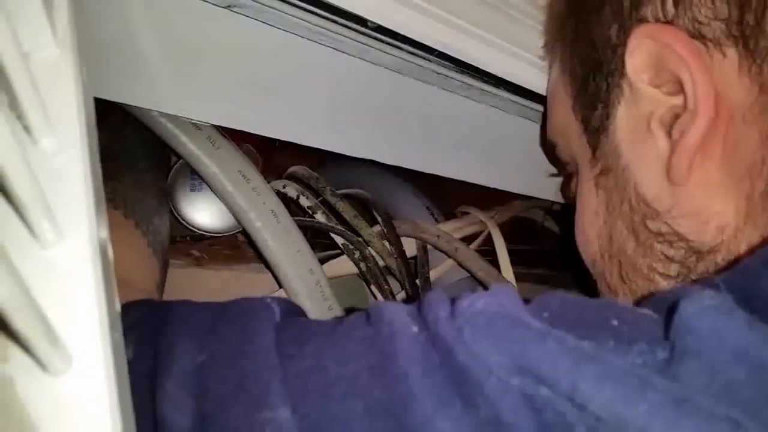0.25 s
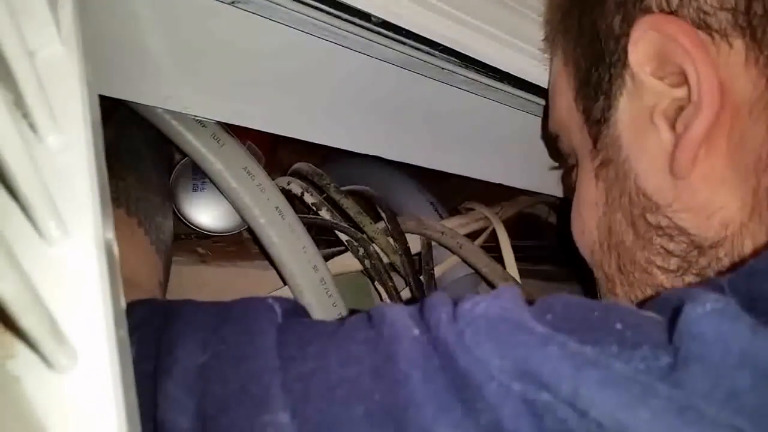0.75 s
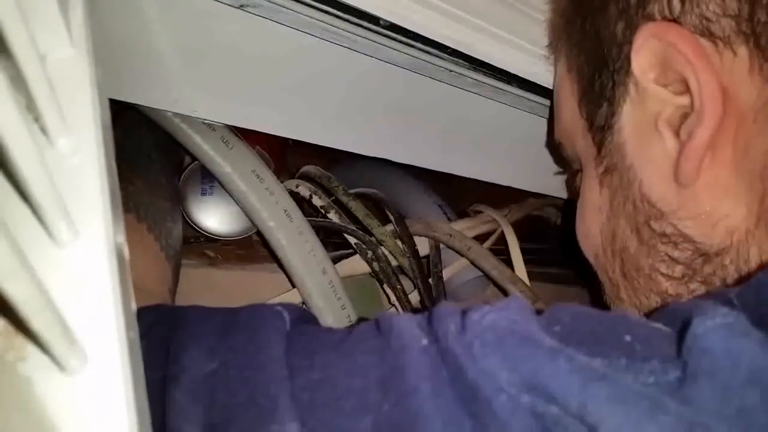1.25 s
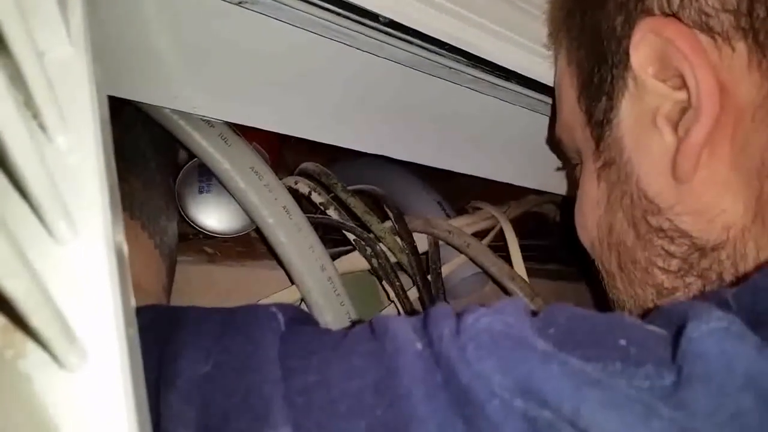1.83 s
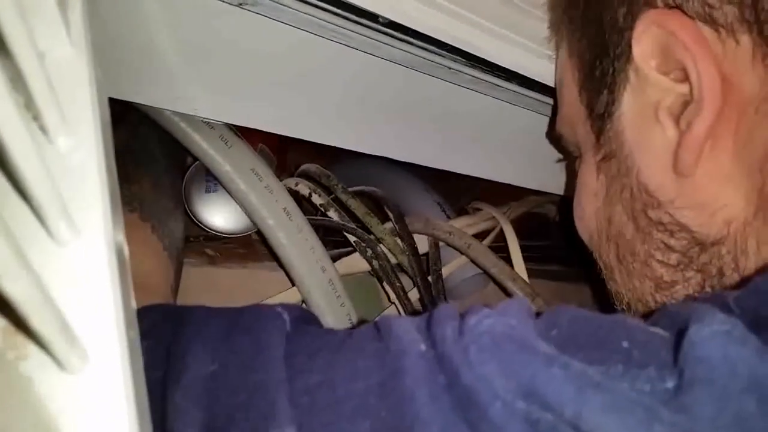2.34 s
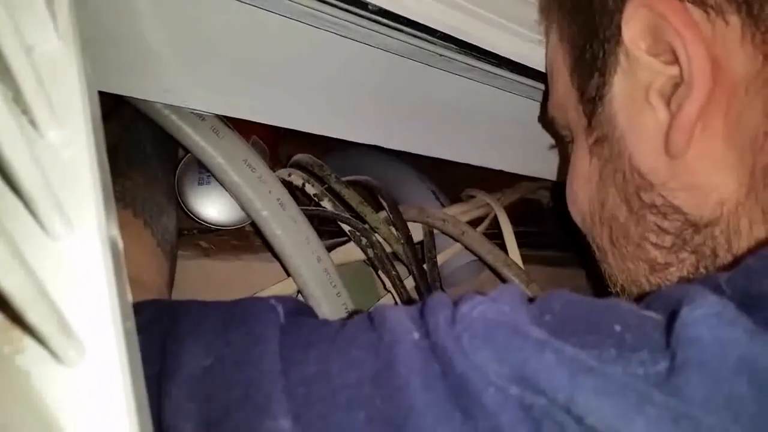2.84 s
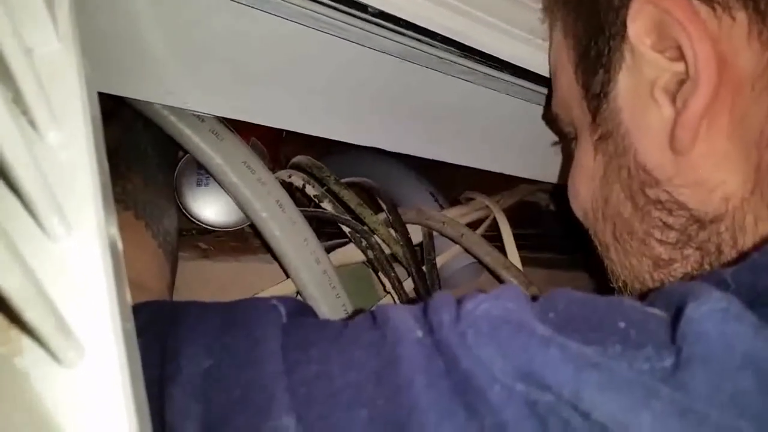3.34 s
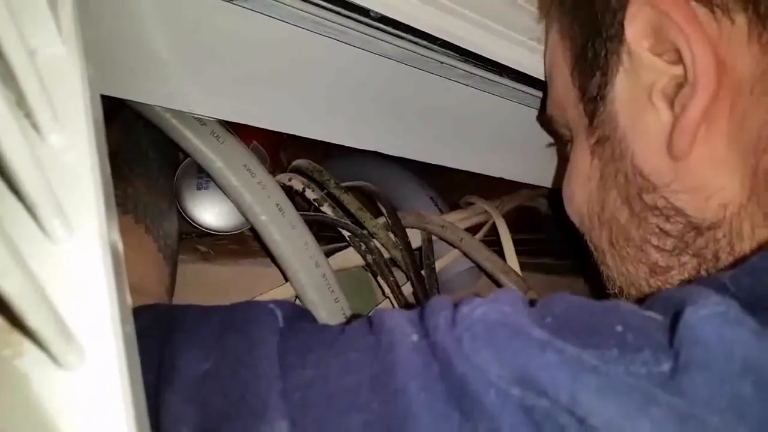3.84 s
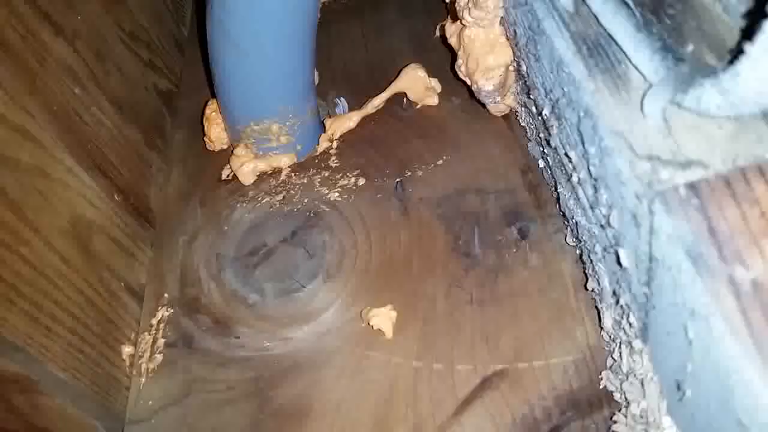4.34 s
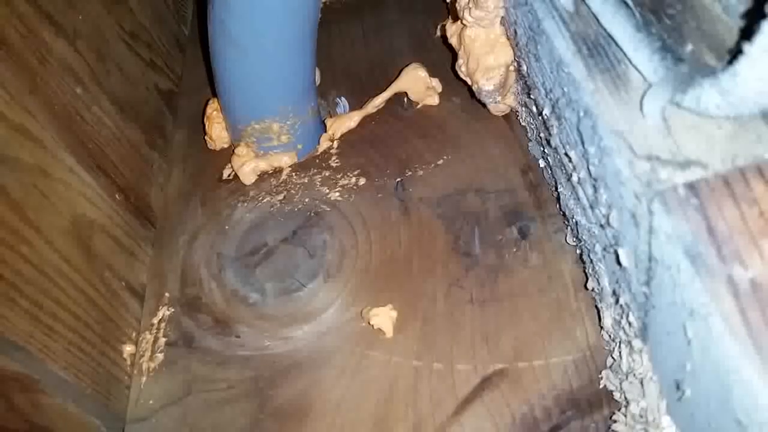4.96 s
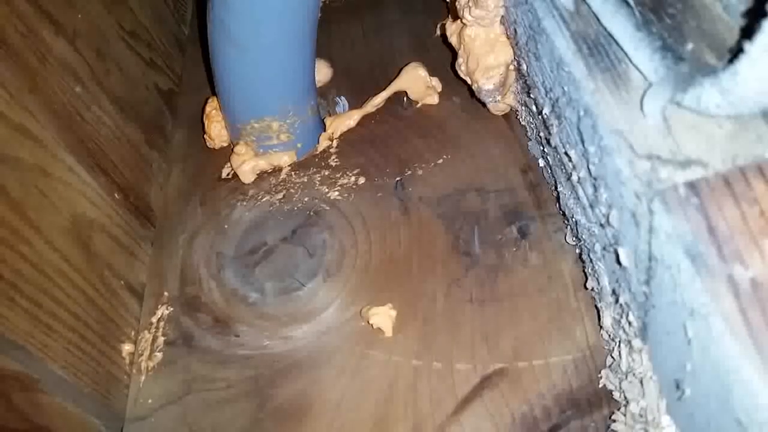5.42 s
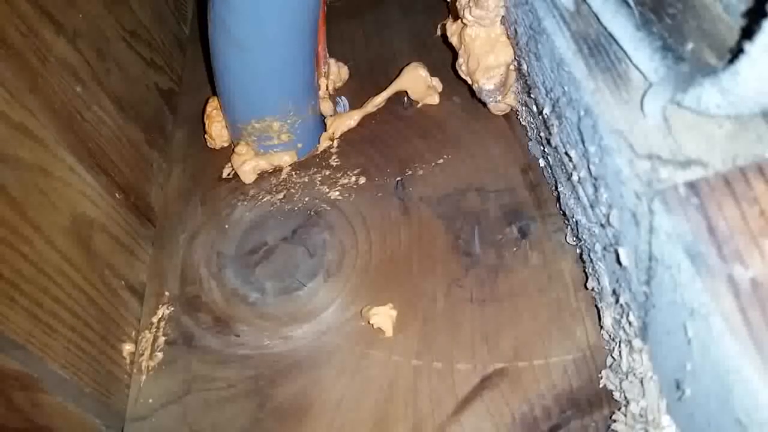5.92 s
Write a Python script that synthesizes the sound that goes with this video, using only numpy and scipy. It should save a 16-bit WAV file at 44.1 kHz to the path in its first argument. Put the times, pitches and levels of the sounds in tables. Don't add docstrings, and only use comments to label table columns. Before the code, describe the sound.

A foam can spurts, spits and blows out amid low wind thumps, then abruptly close, a fading hiss and dull timber knocking.

```python
import sys
import numpy as np
from scipy import signal
from scipy.fft import rfft, irfft, next_fast_len
from scipy.io import wavfile
from scipy.ndimage import uniform_filter1d, map_coordinates

SR = 44100
rng = np.random.default_rng(int(sys.argv[2]) if len(sys.argv) > 2 else 0)


def invert_db(level):
    return 10 ** (np.asarray(level, dtype=float) / 20)


def transcribe(u):
    v = np.clip(np.atleast_2d(u).T, -1, 1)
    q = np.round(v * 32767).astype(np.int16)
    wavfile.write(sys.argv[1], SR, q)


N = 273023
TIME = np.arange(N) / SR
CUT_S = 4.298

# time_s, hiss_db
GAS_FLOW = [(.81, -41), (.817, -44), (.88, -40.5), (1.045, -44.5), (1.11, -33), (1.65, -32.5), (2.05, -31),
            (3.53, -30), (3.6, -29)]
# deepest_s, depth_db, closing_s, clearing_s
FOAM_CHOKES = [(1.025, 68, 0.09, 0.018), (1.201, 13.5, 0.058, 0.094), (1.4, 7.5, 0.044, 0.047),
               (1.6, 3, 0.029, 0.037), (1.78, 2.5, 0.11, 0.22), (2.39, 4, 0.032, 0.027),
               (2.5, -3, 0.11, .14), (2.66, 13, 0.013, 0.012), (2.71, 0.5, .03, 0.029),
               (2.86, 2.5, 0.05, 0.08), (2.96, -3.5, .06, 0.038), (3.08, 3, .14, 0.32)]
# time_s, low_end_db
FOAM_LOAD = [(.8, 3), (1.05, -18), (1.7, -7), (1.95, -2), (2.95, -0.5), (3.25, -12.5), (3.5, -10),
             (3.55, -4.5)]
# freq_hz, level_db_per_hz
JET_HISS = [(1200, -61), (1850, -43), (2200, -4.5), (2600, -20.5), (3300, -16.5), (3930, -15), (4860, -6),
            (6060, -13), (7500, 1), (9450, -6.5), (12700, -5), (14500, -8), (15000, -8.5)]
# freq_hz, level_db_per_hz
JET_BODY = [(520, -67), (700, -9), (950, -9.5), (1100, -13), (1300, -6), (1800, -6), (2300, -5),
            (3000, -2.5), (4000, 1.5), (6000, -4.5), (7500, -2), (10000, -56.5)]
# freq_hz, level_db_per_hz
EDGE_TONE = [(11000, -25.5), (12300, -16), (12850, 2.5), (13300, -21), (14500, -52)]
# freq_hz, width_hz, lift_db
STRAW_MODES = [(1123, 310, 4.5), (1320, 28, 7), (1897, 356, -6), (1957, 110, 6.5), (2260, 300, 1.5),
               (2670, 420, -5.5), (3415, 260, -5.5), (3550, 130, 0.5), (3960, 110, 6), (4470, 300, -4),
               (4970, 29, 5.5), (5703, 190, 11), (6950, 210, -2.5), (8100, 86, 8), (8394, 57, 8),
               (7382, 130, 6.5), (8890, 50, 10), (9900, 70, 5.5), (11900, 190, 7)]
# peak_s, level_db, rise_db_per_s, fall_db_per_s
BLOWOUT_SWELLS = [
    (2.69, -39.5, 599, 84.5),
    (3.6, -22, 113.5, 124.5),
]
# freq_hz, level_db_per_hz
BLOWOUT_ROAR = [(100, -32.5), (220, -4.5), (400, 0), (700, -4), (1000, -19), (1280, -7), (1500, -21.5),
                (2200, -5), (3000, -25)]
# start_s, peak_db, t60_s
SPIT_EVENTS = [
    (.131, -42, 0.039),
    (0.152, -53, 0.12),
    (1.046, -54, 0.033),
    (2.677, -15.5, 0.039),
]
# freq_hz, level_db_per_hz
CLOSE_HISS = [(2350, -13.5), (4000, -24), (5830, -6), (6950, 9.5), (7510, 0), (8770, 10.5), (9850, -0.5),
              (13900, 2.5), (15000, -4)]
# freq_hz, level_db_per_hz
CLOSE_BODY = [(530, -56), (900, -33.5), (1020, -27.5), (1510, -11), (1910, -11.5), (2070, -9), (2780, -15),
              (3620, -16.5), (5000, -15.5), (6500, -20), (11000, -120)]
# freq_hz, width_hz, lift_db
CLOSE_STRAW_MODES = [(2070, 170, 7.5), (2460, 80, 4), (3600, 260, 4), (7200, 330, 4.5), (8400, 81, -4),
                     (10300, 200, 7)]
# peak_s, level_db, rise_db_per_s, fall_db_per_s
DRIBBLE_SWELLS = [
    (4.855, -48, 205, 496),
    (5.0, -53, 150, 451.5),
]
# start_s, thud_db, rap_db_above_thud, click_db_above_thud
TIMBER_KNOCKS = [(4.79, -36, -6, -36), (4.904, -27, -5, 0.5), (4.939, -24.5, -16.5, -20),
                 (5.005, -34, -9, -3), (5.095, -27, -15, -40), (5.14, -28, -15, -45),
                 (5.209, -23.5, -11, -20.5), (5.3, -31, -15, -39), (5.397, -37, -16, -38),
                 (5.407, -23, -11.5, -18.5), (5.492, -26, -7, -18.5), (5.56, -26, -9, -16),
                 (5.577, -25.5, -14, -20), (5.629, -31.5, -17.5, -25), (5.69, -43.5, -9.5, -40),
                 (5.921, -58, -34, -40), (5.961, -55.5, -26, -24), (6.044, -86, -6, -42),
                 (6.156, -32, -29, -42)]
# freq_hz, width_hz, level_db
TIMBER_MODES = [(105, 18, -12), (145, 12, -1), (211.5, 26, -9), (355, 34, -10)]
# freq_hz, width_hz, level_db
FACE_MODES = [(420, 103, 6), (1060, 460, -1.5), (2020, 410, -6)]
# time_s, rumble_db
GRIP_FORCE = [(4.3, -50), (4.8, -45), (4.95, -42.5), (5.4, -43.5), (5.6, -40.5), (5.75, -48.5),
              (6.19, -50.5)]
# freq_hz, level_db_per_hz
GRIP_RUMBLE = [(15, -45), (25, -18), (70, -5), (102, 0.5), (221, -14), (260, -15.5), (339, -23),
               (600, -45.5), (780, -31), (1320, -120)]
# peak_s, level_db, rise_db_per_s, fall_db_per_s
SLEEVE_BRUSH = [
    (4.81, -53.5, 160, 13),
]
# freq_hz, level_db_per_hz
SLEEVE_CLOTH = [(1760, 2.5), (3000, -4.5), (5840, -4), (8870, -4.5), (10700, -10), (11900, 1.5),
                (14000, -7), (15000, -7.5)]
# time_s, buffet_db
DRAUGHT_FORCE = [(0, -35), (.35, -35), (.65, -42), (1.0, -39.5), (1.5, -39.5), (1.7, -44), (2.4, -43.5),
                 (2.9, -39), (3.4, -48), (3.7, -36), (3.94, -41), (4.3, -34.5)]
# freq_hz, level_db_per_hz
DRAUGHT_BUFFET = [(12, -22), (20, -2.5), (97, -6), (109, -3), (145, -17), (182, -24.5), (206, -38.5),
                  (300, -28.5), (390, -58.5), (660, -120)]
# start_s, peak_db, pitch_hz, length_cycles
EDDY_PUFFS = [(0.296, -25.5, 93, 1.6), (0.428, -17, 90, 2.1), (0.869, -20, 100, 1.1),
              (1.851, -29.5, 102, 2.1), (1.917, -24, 105, 1.6), (2.076, -21, 107, 1.83),
              (2.757, -8.5, 99, 1.3), (2.784, -15.5, 109, 2.6), (3.111, -27, 118, 4.9),
              (3.624, -12, 105, 1.04), (3.656, -17, 107, 0.86), (3.767, -4.5, 105, 1.16),
              (3.816, -15, 105, 1.2), (3.923, -10, 103, 1.48), (4.103, -20.5, 100, 1.5),
              (4.239, -23, 109, 1.5), (4.303, -8.5, 120, 1.2)]
# freq_hz, t60_s
ROOM_DECAY = [(300, 1.71), (1500, 1.66), (4000, 0.92), (6000, 0.95), (8000, 0.92), (14000, 0.48)]
# freq_hz, t60_s
CAVITY_DECAY = [(100, 0.82), (1000, 0.24), (10000, 0.22)]
# freq_hz, level_db_per_hz
ROOM_TONE = [(88, -54.5), (150, -4.5), (289, -16), (350, -5), (386, -15.5), (545, -14.5), (972, -25),
             (1430, -38.5), (1730, -34.5), (7940, -44.5), (10000, -56), (13900, -39.5), (15000, -61)]
# freq_hz, level_db_per_hz
CAVITY_TONE = [(150, -36), (250, -8), (433, 3.5), (631, -13.5), (699, -2.5), (1020, -16.5), (3160, -25),
               (3810, -20), (4370, -26.5), (8670, -47), (15000, -18.5)]
# freq_hz, width_hz, lift_db
PORT_COLOUR = [(5700, 520, -8.5), (8740, 730, 9.5), (10000, 370, -2)]
# freq_hz, threshold_db
LOSS_THRESHOLD = [(150, -43), (280, -7.5), (500, -6), (750, -12.5), (1150, -5.5), (1750, -8.5), (2200, -12),
                  (3100, -3.5), (4400, -0.5), (6700, -8), (9000, -15), (14000, -3.5)]


def unit(x):
    return x / np.sqrt(np.mean(x ** 2) + 1e-20)


def along(points, hz):
    f, v = np.transpose(points)
    return np.interp(np.log(hz + 1), np.log(f + 1), v)


def levels(rows):
    s, db = np.transpose(rows)
    return np.interp(TIME, s, db, left=-150, right=-150)


def wobble(rate):
    return map_coordinates(rng.standard_normal(int(N * rate / SR) + 4), [TIME * rate])


def bursts(rows, quick=1):
    total = 0
    for s, db, rise, fall in rows:
        drop_db = np.where(TIME < s, rise * (s - TIME), quick * fall * (TIME - s))
        total = total + invert_db(db - drop_db)
    return total


def filtered(x, response):
    m = next_fast_len(N + SR // 2)
    return irfft(rfft(x, m) * response(np.fft.rfftfreq(m, 1 / SR)), m)[..., :N]


def noise(spectrum, lifts=(), patchy_db=0, channels=1):
    z = signal.stft(rng.standard_normal((channels, N)), nperseg=512)[2]
    field = uniform_filter1d(rng.standard_normal(z.shape[1:]), 6, 0)
    field = uniform_filter1d(field, 12, 1)
    white = signal.istft(z * invert_db(patchy_db * unit(field)), nperseg=512)[1][:, :N]

    def colour(f):
        lift_db = sum(db / (1 + (2 * (f - c) / w) ** 2) for c, w, db in lifts)
        return invert_db(along(spectrum, f) + lift_db)

    return unit(filtered(white, colour))


def ringing(x, modes):
    def response(f):
        total = 0
        for k, (c, w, db) in enumerate(modes):
            total = total + (-1) ** k * invert_db(db) * 1j * f * w / (c * c - f * f + 1j * f * w)
        return total

    return filtered(x, response)


def jet(hiss_gain, body_gain, hiss, body, straw, flutter_db):
    flutter = invert_db(flutter_db * wobble(30.19) + 1.33 * flutter_db * wobble(140))
    hiss_part = hiss_gain * noise(hiss, straw, patchy_db=1.0)
    body_part = body_gain * noise(body, straw, patchy_db=1.5)
    return flutter * (hiss_part + body_part)


def valve():
    end_s, end_db = GAS_FLOW[-1]
    shut_db = end_db - 798.5 * (TIME - end_s)
    flow_db = np.where(TIME < end_s, levels(GAS_FLOW), shut_db)
    choke_db = 0
    for s, db, closing, clearing in FOAM_CHOKES:
        choke_db = choke_db + db * np.interp(TIME, [s - closing, s, s + clearing], [0, 1, 0])

    def opened(half_db, wide_db):
        return np.interp(TIME, [1.46, 1.94], [half_db, wide_db])

    hiss = invert_db(flow_db - choke_db)
    body = invert_db(flow_db - 0.7 * choke_db + opened(-12, -6.5))
    body += invert_db(-2.5) * blowouts(quick=7.5)
    edge = invert_db(flow_db - 2.2 * choke_db + opened(-4.5, -21.5))
    return hiss, body, edge


def laden(x):
    low = filtered(x, lambda f: 1 / (1 + (f / 1284) ** 4))
    return x - (1 - invert_db(np.interp(TIME, *np.transpose(FOAM_LOAD)))) * low


def blowouts(quick=1):
    break_s, break_db_per_s = 0.06, 2502.5
    total = 0
    for row in BLOWOUT_SWELLS:
        sealed_s = np.maximum(row[0] - break_s - TIME, 0)
        total = total + bursts([row], quick) * invert_db(-break_db_per_s * sealed_s)
    return total


def spits():
    envelope = 0
    for s, db, t60 in SPIT_EVENTS:
        decay_db = 60 * np.abs(TIME - s) / max(t60, .002)
        envelope = envelope + invert_db(db - 6.5 - decay_db) * (TIME > s)
    return envelope * noise([(300, -18), (1300, -8), (3700, -5.0), (8000, -9.5), (15000, -43)])


def last_squirt():
    def held(db, sag_db_per_s, end_s):
        shut_db = 445 * np.maximum(TIME - end_s, 0)
        return invert_db(db - sag_db_per_s * (TIME - CUT_S) - shut_db) * (TIME > CUT_S - .1)

    dribbles = bursts(DRIBBLE_SWELLS)
    hiss = held(-38.5, 6.5, 4.71) + dribbles
    body = held(-37.5, 2, 4.71 - 0.02) + invert_db(-15) * dribbles
    return hiss, body


def knocks():
    thud, rap, click = np.zeros((3, N))
    t = np.arange(SR // 20) / SR
    for s, db, rap_db, click_db in TIMBER_KNOCKS:
        start = round(s * SR)
        here = slice(start, start + len(t))
        grit = rng.standard_normal((2, len(t)))[:, :len(rap[here])]
        after_s = t[:grit.shape[1]]
        thud[start] = invert_db(db + 49)
        rap_gain = invert_db(db + rap_db + 15 - 60 * after_s / 0.027)
        rap[here] += rap_gain * np.minimum(after_s / 0.0023, 1) * grit[0]
        click[here] += invert_db(db + click_db + 3.5 - 60 * after_s / 0.0076) * grit[1]
    bright = ringing(rap, FACE_MODES) + filtered(click, lambda f: 1j * f / (4000 + 1j * f))
    soft = filtered(thud, lambda f: 1 / (1 + 1j * f / 450) ** 2)
    return ringing(soft, TIMBER_MODES), bright


def handling():
    low = noise(GRIP_RUMBLE, channels=2)
    side = low[1] * np.array([[1], [-1]])
    rumble = invert_db(0.28 * wobble(16)) * (low[0] + 0.32 * side)
    cloth = invert_db(2.2 * wobble(25)) * noise(SLEEVE_CLOTH, PORT_COLOUR, channels=2) * invert_db([[-1], [2]])
    return invert_db(levels(GRIP_FORCE)) * rumble + bursts(SLEEVE_BRUSH) * cloth


def draught():
    lumps = invert_db(3.64 * np.array([wobble(11), wobble(5)]))
    buffet = unit(lumps * noise(DRAUGHT_BUFFET, channels=2))
    buffet = invert_db(levels(DRAUGHT_FORCE)) * buffet * invert_db([[6], [-11]])
    for s, db, hz, cycles in EDDY_PUFFS:
        turns = (TIME - s) * hz
        swell = np.exp(-(2 * (turns - .2) / cycles) ** 2)
        buffet[0] += invert_db(db) * swell * np.cos(2 * np.pi * turns)
    return buffet


def space(x, decay, walls_s, direct, wet_db, lag):
    t = np.arange(SR // 10) / SR
    walls = rng.standard_normal((2, len(t))) * invert_db(-60 * t / walls_s)
    walls /= np.linalg.norm(walls[0])
    walls[[0, 1], [lag, 0]] += direct
    hz, u, z = signal.stft(rng.standard_normal((2, SR)), SR, nperseg=256)
    dying = z * invert_db(-60 * u / along(decay, hz)[:, None])
    tail = signal.istft(dying, SR, nperseg=256)[1][:, :SR]
    path = invert_db(wet_db) * tail / np.linalg.norm(tail[0])
    path[:, :len(t)] += walls
    path[1] += signal.lfilter([.07], [1, -.93], path[0] - path[1])
    response = rfft(path)
    response /= np.sqrt(uniform_filter1d(np.abs(response) ** 2, size=500, axis=1))
    path = np.roll(irfft(response, SR), 200, axis=1)
    return signal.fftconvolve(x * np.ones((2, 1)), path, axes=1)[:, 200:N + 200]


def starved(x):
    top_hz = 14600
    hz, _, z = signal.stft(x, SR, nperseg=2048, noverlap=1024, window="cosine")
    band = (35 * np.log(1 + hz / 2200)).astype(int)
    starts = np.flatnonzero(np.diff(band, prepend=-1))
    power = (np.abs(z) ** 2).mean(0)
    treble_rows = power[(hz > 1500) & (hz < top_hz)]
    treble = np.exp(np.log(treble_rows + 1e-20).mean(0))
    busy = treble / (treble + invert_db(-172))
    level = (np.add.reduceat(power, starts) / np.bincount(band)[:, None])[band]
    waver = uniform_filter1d(rng.standard_normal((band[-1] + 1, z.shape[-1])), size=3, axis=1)
    level *= invert_db(3.06 * unit(waver))[band]
    threshold = busy * treble * invert_db(2 * along(LOSS_THRESHOLD, hz))[:, None]
    margin = level / (threshold + 1e-20)
    kept = (hz < top_hz)[:, None] / (1 + (margin + 1e-9) ** -8)
    return signal.istft(z * kept, SR, nperseg=2048, noverlap=1024, window="cosine")[1][:, :N]


def scene():
    spit = spits()
    hiss_gain, body_gain, edge_gain = valve()
    spray = invert_db(3) * laden(jet(hiss_gain, body_gain, JET_HISS, JET_BODY, STRAW_MODES, flutter_db=0.8))
    spray += 0.5 * spit
    spray += blowouts() * invert_db(2.0 * wobble(60)) * noise(BLOWOUT_ROAR, patchy_db=2.5)
    spray += edge_gain * noise(EDGE_TONE, patchy_db=-3.5)
    room = space(spray, ROOM_DECAY, 0.084, 0.53, -11.0, lag=4) + spit
    room += invert_db(-54.5) * noise(ROOM_TONE, PORT_COLOUR, channels=2)

    thud, bright = knocks()
    squirt = invert_db(2) * jet(*last_squirt(), CLOSE_HISS, CLOSE_BODY, CLOSE_STRAW_MODES, flutter_db=.4)
    cavity = space(squirt + 1.23 * bright, CAVITY_DECAY, 0.016, 0.14, -5.4, lag=0) * invert_db([[-2], [2]])
    cavity += thud + 0.35 * bright + handling()
    cavity += invert_db(-60.0) * noise(CAVITY_TONE, PORT_COLOUR, channels=2)
    return np.where(TIME < CUT_S, room, cavity) + draught()


def low_pass(x):
    return signal.sosfilt(signal.butter(12, 15800, fs=SR, output="sos"), x)


def record(dry):
    mix = starved(dry)
    return low_pass(mix)


dry = scene()
out = record(dry)
transcribe(out)
```